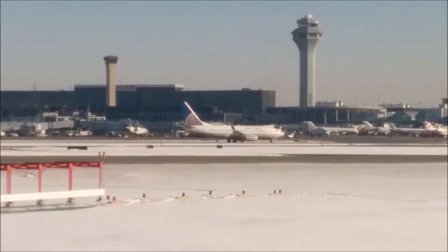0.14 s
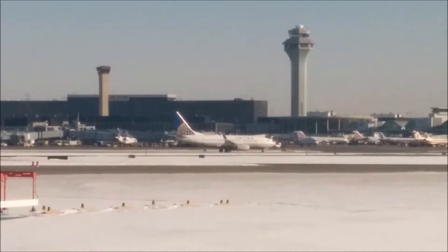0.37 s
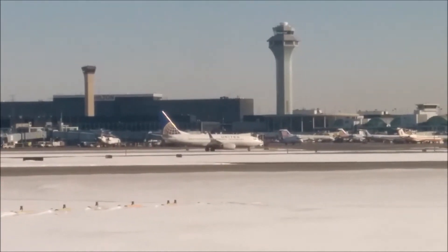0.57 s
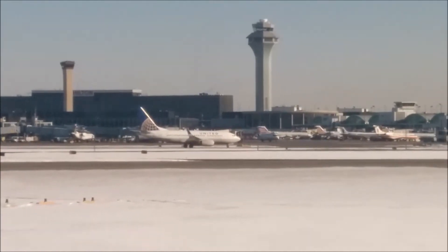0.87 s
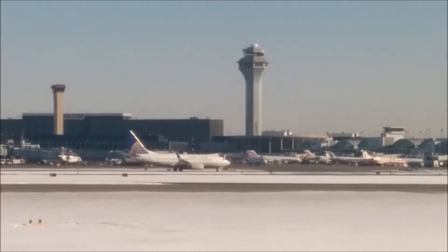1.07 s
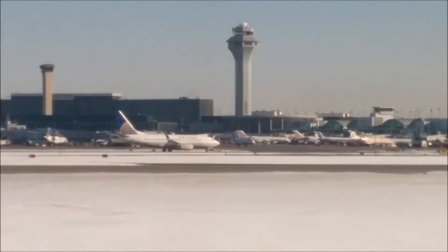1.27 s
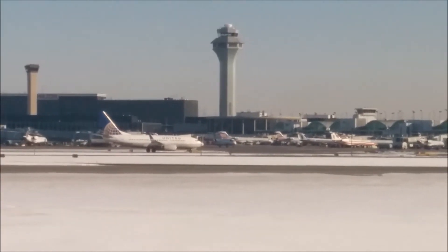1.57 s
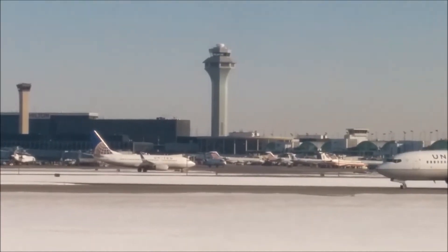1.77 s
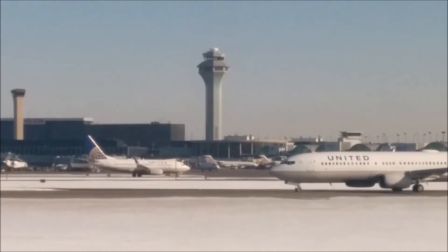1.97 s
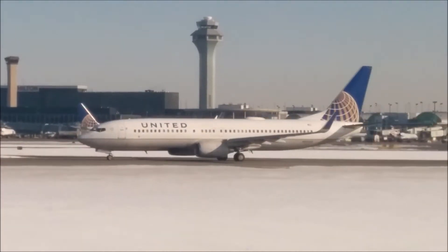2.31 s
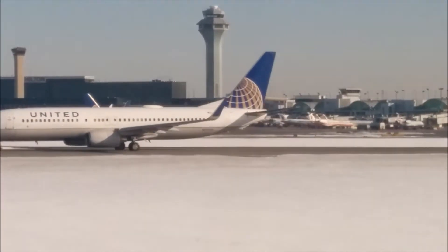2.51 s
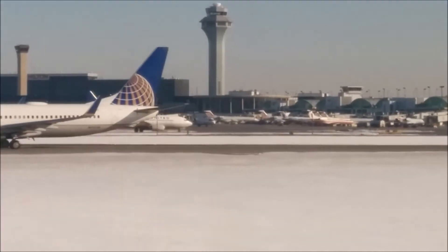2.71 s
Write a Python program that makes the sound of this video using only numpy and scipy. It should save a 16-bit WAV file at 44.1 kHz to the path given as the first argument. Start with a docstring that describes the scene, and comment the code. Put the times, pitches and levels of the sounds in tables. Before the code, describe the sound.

Inside an airliner cabin rolling along the ground, a muffled engine drone swells and fades above bassy wheel rumble. A dull panel knock comes early, then close scuffs and ticks, with quiet vent hiss throughout.

```python
"""Aircraft engines at idle hum in a few wavering tones, heard inside an airliner that taxis.
Each hum is a sine whose pitch and level drift; the muffled engine roar and outside air are banded noise.
The wheels rumble as noise, with ringing hull resonances and a low shuddering tone at each bump.
Air vents hiss, whine and whistle. Close by, shaped noise makes fabric rustle and scuff,
and loose plastic fittings ring as they tick, knock and scrape, or squeak in gliding tones."""
import sys
import numpy as np
from scipy import signal
from scipy.fft import rfft, irfft
from scipy.io import wavfile

SR = 44100
rng = np.random.default_rng(int(sys.argv[2]) if len(sys.argv) > 2 else 0)


def output_pcm(signal):
    """Save a mono or channel-first signal as 16-bit PCM at the path in sys.argv[1].

    Samples are clipped to [-1, 1] before scaling.
    """
    pcm = np.clip(np.atleast_2d(signal).T, -1, 1) * 32767
    wavfile.write(sys.argv[1], SR, np.round(pcm).astype(np.int16))


N = 125685  # length in samples


def from_db(db):
    """Turn decibels into a gain."""
    return 10 ** (np.asarray(db) / 20)


def rms_one(x):
    """Scale a sound to an rms (average strength) of 1."""
    return x / np.sqrt(np.mean(x ** 2) + 1e-20)


def clock():
    """Time of each sample in seconds."""
    return np.arange(N) / SR


def level(rows):
    """Gain over time, joining (time [s], level [dB]) points with straight lines in dB."""
    return from_db(np.interp(clock(), *np.transpose(rows)))


def drift(rate):
    """Slow random motion with a spread of about 1; a higher rate [Hz] moves faster."""
    step = 40  # make one value every 40 samples, then join them
    warm_up = 2000
    r = np.exp(-2 * np.pi * rate * step / SR)
    noise = rng.standard_normal(N // step + 2 + warm_up)
    slow = signal.lfilter([1], [1, -2 * r, r * r], noise)[warm_up:]
    return np.interp(np.arange(N) / step, np.arange(len(slow)), rms_one(slow))


def white():
    """Plain hiss with all pitches equally strong."""
    return rng.standard_normal(N)


GRAIN_SPREAD_DB = 3.0


def grains(per_s):
    """Random clicks of uneven size and either sign; rms 1."""
    size_db = GRAIN_SPREAD_DB * np.minimum(rng.exponential(1, N), 3)
    sizes = from_db(size_db) * rng.choice([-1, 1], N)
    return rms_one(sizes * (rng.random(N) < per_s / SR))


def wavering(hz, wander_hz, rate):
    """A sine whose pitch wanders at random."""
    cycles = np.cumsum(hz + wander_hz * drift(rate)) / SR
    return np.sin(2 * np.pi * (cycles + rng.random()))


def swell(s, length):
    """A smooth rise and fall, highest at time s, lasting length seconds in all."""
    return np.cos(np.pi * np.clip((clock() - s) / length, -.5, .5)) ** 2


def envelope(s, attack_s, hold_s, t60):
    """Rise from time s, hold, then die away by 60 dB in t60 seconds."""
    age = clock() - s
    rise = np.clip(age / attack_s, 0, 1)
    return rise * np.exp(-np.log(1000) * np.maximum(age - attack_s - hold_s, 0) / t60)


def ring(force, modes):
    """Each mode is a tone that dies away; a unit click starts it at its level."""
    out = 0
    for hz, db, t60 in modes:
        r = np.exp(-np.log(1000) / (t60 * SR))
        w = 2 * np.pi * hz / SR
        mode = signal.lfilter([0, np.sin(w)], [1, -2 * r * np.cos(w), r * r], force + 1e-18)
        out = -out + from_db(db) * mode  # neighbours get opposite signs
    return out


def tint(x, spectrum):
    """Give steady noise a smooth spectrum with a steep cut below its lowest point; rms 1."""
    points, db = np.transpose(spectrum)
    hz = np.arange(N // 2 + 1) * SR / N + 1  # the 1 avoids log(0)
    low_cut = np.minimum(hz / points[0], 1) ** 4
    gain = from_db(np.interp(np.log(hz), np.log(points), db)) * low_cut
    return rms_one(irfft(rfft(x) * gain, N))


def turbulence(spectrum, patchy_db, surge_db):
    """Quarter-octave bands of noise; each flickers alone and all surge together; rms 1."""
    hz, db = np.transpose(spectrum)
    edges = 18 * 2 ** (np.arange(41) / 4)
    pair = white(), white()  # neighbouring bands use different noise
    surge = surge_db * drift(22)
    out = 0
    for k, (low, high) in enumerate(zip(edges, edges[1:])):
        if high < hz[0] or low > hz[-1]:
            continue
        flicker = patchy_db * drift(16)
        band_filter = signal.butter(3, [low, high], "band", fs=SR, output="sos")
        band = signal.sosfilt(band_filter, pair[k % 2])
        band_db = np.interp(np.log(low * high) / 2, np.log(hz), db)
        out = out + band * from_db(band_db + flicker)
    return rms_one(out * from_db(surge))


# engine roar through the hull: (frequency [Hz], relative level [dB per Hz])
ROAR_SPECTRUM = [(220, -3.5), (280, 5), (330, -4), (400, -4.5), (480, -17)]
# engine roar over time: (time [s], level [dB])
ROAR_LEVEL = [(0, -40.5), (.2, -42.5), (.32, -41), (.43, -50.5), (.56, -30), (.68, -46.5), (.95, -42.5),
              (1.18, -45), (1.28, -35), (1.42, -42.5), (1.69, -37), (2.02, -39), (2.1, -29), (2.22, -42),
              (2.3, -36.5), (2.5, -40.5), (2.85, -35.5)]
# rush of air along the hull: (frequency [Hz], relative level [dB per Hz])
RUSH_SPECTRUM = [(340, -7.5), (430, 2), (540, -9.5), (660, -9.5), (820, -15.5), (1100, -26.5),
                 (1400, -30.5)]
# rush of air over time: (time [s], level [dB])
RUSH_LEVEL = [(0, -44), (.25, -45.5), (.32, -39.5), (.37, -49), (.7, -47), (.9, -45), (1.0, -47),
              (1.3, -43), (1.65, -48.5), (1.86, -42.5), (2.08, -47), (2.16, -42.5), (2.22, -46.5),
              (2.65, -47.5), (2.85, -39.5)]
ROAR_PATCHY_DB, ROAR_SURGE_DB = 3.2, 1.8


def roar():
    """Muffled engine noise and the rush of outside air: noise bands that surge and sag."""
    engine_roar = level(ROAR_LEVEL) * turbulence(ROAR_SPECTRUM, ROAR_PATCHY_DB, ROAR_SURGE_DB)
    air_rush = level(RUSH_LEVEL) * turbulence(RUSH_SPECTRUM, ROAR_PATCHY_DB, ROAR_SURGE_DB)
    return engine_roar + air_rush


# hiss of the air vents: (frequency [Hz], relative level [dB per Hz])
VENT_SPECTRUM = [(500, 11.5), (800, 6), (1100, 8.5), (1600, -0.5), (2100, 4.5), (2700, -1), (3300, -12.5),
                 (3900, -2.5), (4600, -26.5), (6200, -22.5), (8500, -50.5), (12000, -35), (15500, -32)]
# vent hiss over time: (time [s], level [dB])
VENT_LEVEL = [(0, -52.5), (.3, -51.5), (.4, -61), (.52, -51), (.66, -50.5), (.9, -58), (1.15, -54.5),
              (1.3, -54.5), (1.45, -55), (1.53, -53), (1.6, -58.5), (1.7, -49.5), (1.85, -52.5),
              (2.15, -54.5), (2.38, -54), (2.5, -60.5), (2.56, -50.5), (2.69, -55), (2.75, -58.5),
              (2.85, -49.5)]
# whine of the air nozzle over time: (time [s], level [dB rms])
WHINE_LEVEL = [(0, -54.5), (.4, -64), (.65, -58), (1.0, -63), (1.6, -66.5), (1.95, -58.5), (2.3, -58),
               (2.52, -60), (2.85, -59.5)]
VENTS_PATCHY_DB, VENTS_SURGE_DB = 3.6, .8
WHINE_HZ, WHINE_WANDER_HZ, WHINE_JITTER_HZ, WHINE_FLUTTER_DB = 2100, 85, 90, 4.5
WHISTLE_S, WHISTLE_LENGTH_S, WHISTLE_HZ, WHISTLE_T60_S = 1.91, 0.5, 5980, .01
WHISTLE_DB, WHISTLE_FLUTTER_DB = -68, 2.5


def vents():
    """Cabin air hisses as noise, a nozzle whines with a shaky pitch, and a faint whistle passes."""
    hiss = level(VENT_LEVEL) * turbulence(VENT_SPECTRUM, VENTS_PATCHY_DB, VENTS_SURGE_DB)
    flutter = from_db(WHINE_FLUTTER_DB * np.clip(drift(28), -2, 1.5))
    whine_hz = WHINE_HZ + WHINE_WANDER_HZ * drift(14)
    whine = rms_one(flutter * wavering(whine_hz, WHINE_JITTER_HZ, rate=220))
    # noise through one quickly damped mode makes the whistle hissy
    airy_tone = rms_one(ring(white(), [(WHISTLE_HZ, 0, WHISTLE_T60_S)]))
    whistle_gain = from_db(WHISTLE_DB + WHISTLE_FLUTTER_DB * drift(25))
    whistle = whistle_gain * swell(WHISTLE_S, WHISTLE_LENGTH_S) * airy_tone
    return hiss + level(WHINE_LEVEL) * whine + whistle


# soft rustle: (frequency [Hz], relative level [dB per Hz])
RUSTLE_SPECTRUM = [(2000, -22), (3500, -6), (4700, -16), (6000, -1.5), (7000, 3), (8300, 2), (9500, -4.5),
                   (11500, -5), (13500, -15), (15500, -33.5)]
# rustle over time: (time [s], level [dB])
RUSTLE_LEVEL = [(0, -54), (.14, -58.5), (.34, -64), (.42, -72), (.51, -74.5), (.56, -63.5), (.63, -61.5),
                (.68, -54.5), (.78, -61), (.98, -55), (1.12, -52.5), (1.19, -50.5), (1.3, -51),
                (1.45, -61.5), (1.62, -71.5), (1.8, -70), (2.03, -79), (2.08, -57.5), (2.2, -70),
                (2.37, -72.5), (2.43, -67), (2.68, -73.5), (2.85, -65.5)]
# harder scuffs: (frequency [Hz], relative level [dB per Hz])
SCUFF_SPECTRUM = [(300, 26.5), (550, 23), (900, 8.5), (1600, 6), (2200, 8), (3800, 8.5), (4800, 1.5),
                  (7000, 6.5), (9000, 4.5), (12000, -5.5), (15000, -15)]
# each scuff: (start time [s], hold [s], level before roughness [dB])
SCUFFS = [(0.634, 0.041, -47), (1.004, 0.016, -30), (1.038, 0.005, -39.5), (1.248, 0.015, -43),
          (2.685, 0.032, -53.5)]
FIBRES_PER_S, FIBRES_DB = 840, -4  # small clicks; level relative to the hiss
SCUFF_GRAINS_PER_S, SCUFF_GRAINS_DB = 1500, 0
SCUFF_ATTACK_S, SCUFF_T60_S, SCUFF_ROUGH_DB = .018, .16, 1.5


def fabric():
    """Cloth slides softly as noise mixed with tiny clicks, with a few grainy scuffs."""
    fibres = from_db(FIBRES_DB) * grains(FIBRES_PER_S)
    rustle = level(RUSTLE_LEVEL) * tint(white() + fibres, RUSTLE_SPECTRUM)
    strokes = 0
    for s, hold_s, db in SCUFFS:
        strokes = strokes + from_db(db) * envelope(s, SCUFF_ATTACK_S, hold_s, SCUFF_T60_S)
    grit = from_db(SCUFF_GRAINS_DB) * grains(SCUFF_GRAINS_PER_S)
    roughness = from_db(SCUFF_ROUGH_DB * drift(97))
    return rustle + strokes * roughness * tint(white() + grit, SCUFF_SPECTRUM)


# ringing of the plastic trim: (frequency [Hz], relative level [dB], time to fall 60 dB [s])
TRIM_MODES = [(520, 8, .05), (610, 6, .05), (877, -3, .05), (1960, -2, .04), (2740, -2, .015),
              (3400, -3, .015), (4160, -3, .02)]
DRAG_S, DRAG_LENGTH_S, DRAG_DB = 1.05, 0.13, -39.5


def drag():
    """The hardest scuff drags over plastic trim: grains of friction make it ring."""
    scrape = rms_one(ring(grains(SCUFF_GRAINS_PER_S), TRIM_MODES))
    return from_db(DRAG_DB) * swell(DRAG_S, DRAG_LENGTH_S) * scrape


# trim squeaks: (peak time [s], length [s], pitch [Hz], glide [Hz per s], pitch jitter [Hz],
# peak level before roughness [dB])
SQUEAKS = [(.122, .025, 2750, -4000, 90, -55), (1.555, .02, 3400, 15000, 220, -55),
           (1.659, .035, 3050, -8000, 120, -52), (1.685, .06, 2830, -8000, 150, -56),
           (1.997, .055, 2840, 1500, 80, -54), (2.443, .05, 3880, -3000, 40, -55),
           (2.71, .06, 3920, -4000, 60, -56)]
SQUEAK_ROUGH = .45  # share of random level change


def squeaks():
    """Trim rubs in short, rough squeaks: shaky tones that glide in pitch."""
    out = 0
    for s, length, hz, glide, jitter_hz, db in SQUEAKS:
        tone = wavering(hz + glide * (clock() - s), jitter_hz, rate=180)
        roughness = 1 + SQUEAK_ROUGH * drift(170)
        out = out + from_db(db) * swell(s, length) * tone * roughness
    return out


# a loose fitting ticks: (start time [s], level [dB], ringing relative to the crack [dB])
TICKS = [(0.572, -56, 6.5), (0.639, -43, 0), (0.651, -54.5, 6), (0.663, -60, 7), (0.685, -47, -16),
         (0.909, -51, -1.5), (1.157, -36.5, -9), (1.17, -34.5, -10), (1.207, -49, -5), (1.238, -47, 0),
         (1.256, -55, 8), (1.272, -37.5, -0.5), (1.384, -51.5, -2), (2.035, -65, 8), (2.056, -51, 8.5),
         (2.067, -63, 13)]
# noisy crack of each tick: (frequency [Hz], relative level [dB per Hz])
CRACK_SPECTRUM = [(2500, -12.5), (3500, -6.5), (4600, -24), (5600, 4.5), (8000, 3), (10500, -0.5),
                  (13000, -6.5), (15500, -18.5)]
# ringing of the fitting: (frequency [Hz], relative level [dB], time to fall 60 dB [s])
TICK_MODES = [(5420, 0, .011), (5850, -3, .008)]
TICK_T60_S, TICK_ATTACK_S = .04, .002


def ticks():
    """Gritty contacts: short bursts of noise and of a noisily ringing part, in varied mixes."""
    crack = tint(white(), CRACK_SPECTRUM)
    ringing = rms_one(ring(white(), TICK_MODES))
    out = 0
    for s, db, ring_db in TICKS:
        burst = envelope(s, TICK_ATTACK_S, 0, TICK_T60_S)
        out = out + from_db(db) * burst * (crack + from_db(ring_db) * ringing)
    return out


# blows to a loose panel: (time [s], level before the panel rings [dB])
KNOCKS = [(.559, -5.5), (.567, -5.5), (.5735, 2.5), (.587, -8), (.598, -10)]
# ringing of the panel: (frequency [Hz], level for a unit click [dB], time to fall 60 dB [s])
PANEL_MODES = [(294, -28.5, 0.05), (370, -28, 0.05), (473, -30.5, 0.086), (593, -27, 0.049),
               (724, -36, .05), (866, -39, 0.1), (1100, -40, 0.032), (1207, -41, 0.028)]
JUDDER_S, JUDDER_LENGTH_S, JUDDER_DB = .58, .075, -30  # level before the panel rings


def knock():
    """A quick run of clicks and a short burst of noise set a loose panel ringing."""
    force = from_db(JUDDER_DB) * swell(JUDDER_S, JUDDER_LENGTH_S) * white()
    for s, db in KNOCKS:
        force = force + from_db(db) * (np.arange(N) == int(s * SR))
    return ring(force, PANEL_MODES)


# low rumble of the wheels: (frequency [Hz], relative level [dB per Hz])
RUMBLE_SPECTRUM = [(20, -37), (32, -28.5), (48, -8), (70, -6.5), (100, 3.5), (140, -2.5), (180, -3),
                   (240, -18.5), (300, -18.5)]
# rolling sound over time: (time [s], relative level [dB])
ROAD_LEVEL = [(0, 10.5), (.1, -2.5), (.22, -2), (.33, 0.5), (.43, -6.5), (.57, -0.5), (.64, -0.5),
              (.7, -5.5), (.8, -1.5), (.87, -9.5), (.91, -12.5), (.965, -13.5), (1.02, 3.5), (1.09, -6),
              (1.22, -4), (1.32, -5), (1.41, -0.5), (1.48, -3), (1.54, 1.5), (1.62, -4), (1.75, -3),
              (1.85, -1), (1.94, -3.5), (2.04, -6), (2.08, 0), (2.11, -3.5), (2.19, -8), (2.25, 1),
              (2.41, 2.5), (2.5, -12), (2.565, 10), (2.62, -6), (2.69, 6), (2.75, -8), (2.82, 1)]
# hull resonances: (frequency [Hz], relative level [dB], time to fall 60 dB [s])
HULL_MODES = [(92, -6.5, 0.3), (118.6, 2, 0.17), (143.8, -1.5, 0.43)]
# hull shudders over bumps: (peak time [s], length [s], pitch [Hz], peak level [dB])
SHUDDERS = [(0.174, 0.097, 85.5, -12.5), (0.268, 0.46, 54.4, -24), (0.286, 0.14, 92, -7),
            (0.729, 0.032, 105, -8.5), (0.861, 0.016, 127.6, -9), (0.995, 0.038, 109.5, -11),
            (1.023, 0.079, 95.74, -6.5), (1.08, 0.2, 50, -19.5), (1.131, 0.077, 85.5, -13.5),
            (1.154, 0.027, 100.3, -3.5), (1.217, 0.022, 110.2, -9), (1.39, 0.15, 56, -17),
            (1.392, 0.26, 92, -15), (1.771, 0.079, 51.55, -17.5), (1.834, 0.049, 147.2, -11),
            (1.935, .04, 89.94, -14), (2.235, 0.057, 75.3, -18), (2.266, 0.024, 124.8, -7.5),
            (2.446, 0.11, 55, -16), (2.555, 0.07, 120, -13), (2.672, 0.13, 60.45, -20.5),
            (2.695, 0.098, 98, -13.5)]
RUMBLE_DB, HULL_DB = -22, -25.5  # before the rolling level is applied
RUMBLE_PATCHY_DB, RUMBLE_SURGE_DB, SHUDDER_WANDER_HZ = 2.5, 2.0, 3.96


def wheels():
    """Rolling rumble and noise-driven hull ringing, plus a brief low boom at each bump."""
    rumble = from_db(RUMBLE_DB) * turbulence(RUMBLE_SPECTRUM, RUMBLE_PATCHY_DB, RUMBLE_SURGE_DB)
    hull = from_db(HULL_DB) * rms_one(ring(white(), HULL_MODES))
    out = level(ROAD_LEVEL) * (rumble + hull)
    for s, length, hz, db in SHUDDERS:
        boom = wavering(hz, SHUDDER_WANDER_HZ, rate=18.2)
        out = out + from_db(db) * swell(s, length) * boom
    return out


# main engine drone: (time [s], level before its random swing [dB rms])
DRONE_LEVEL = [(0, -25), (.1, -32), (.25, -37), (.3, -20.5), (.4, -45.5), (.55, -21.5), (.64, -21.5),
               (.7, -38), (.8, -25.5), (.95, -40.5), (1.13, -44.5), (1.29, -29.5), (1.33, -43.5),
               (1.62, -34), (1.71, -20.5), (1.78, -40), (1.82, -21), (1.89, -20.5), (1.93, -37),
               (2.13, -22.5), (2.17, -32), (2.3, -19), (2.48, -34), (2.54, -25), (2.75, -41.5), (2.81, -22),
               (2.85, -37)]
# second engine tone: (time [s], level before its gain and random swing [dB rms])
HUM_LEVEL = [(0.0, -37.5), (0.44, -43.5), (0.53, -36.5), (0.81, -40.5), (0.92, -50.5), (0.96, -34.5),
             (1.42, -44), (1.51, -34.5), (1.81, -48.5), (1.88, -36), (2.04, -42.5), (2.12, -32),
             (2.29, -44), (2.38, -34), (2.52, -43.5), (2.56, -31), (2.7, -42), (2.85, -28)]
# weaker tones: (pitch [Hz], level [dB rms], swing of the level [dB], pitch wander [Hz])
WEAK_TONES = [(413.5, -50, 6, 4), (727, -63, 3, 3), (1954, -70, 6, 14)]
DRONE_HZ, DRONE_WANDER_HZ, DRONE_SWING_DB = 208.8, 3, 2
HUM_HZ, HUM_WANDER_HZ, HUM_SWING_DB, HUM_GAIN_DB = 347.8, 3.2, 2, -1


def engines():
    """Two sine-like engine tones swell, fade and waver, with weaker ones that come and go."""
    drone_swing = from_db(DRONE_SWING_DB * drift(34))
    drone = level(DRONE_LEVEL) * drone_swing * wavering(DRONE_HZ, DRONE_WANDER_HZ, rate=14.2)
    hum_swing = from_db(HUM_GAIN_DB + HUM_SWING_DB * drift(20))
    hum = level(HUM_LEVEL) * hum_swing * wavering(HUM_HZ, HUM_WANDER_HZ, rate=12)
    out = drone + hum
    for hz, db, swing_db, wander_hz in WEAK_TONES:
        swing = rms_one(from_db(swing_db * np.tanh(drift(8))))
        out = out + from_db(db) * swing * wavering(hz, wander_hz, rate=10)
    return np.sqrt(2) * out  # a sine of rms 1 peaks at the square root of 2


def scene():
    """Add all the sounds together in one channel."""
    background = roar() + vents()
    close_by = fabric() + drag() + squeaks() + ticks() + knock()
    return (background + close_by + wheels() + engines())[None]


CUTOFF_HZ, FADE_S = 15700, .004


def record(dry):
    """Fade both ends briefly and cut the highest treble steeply."""
    ease = np.clip(np.minimum(clock(), clock()[::-1]) / FADE_S, 0, 1)
    treble_cut = signal.ellip(10, .1, 80, CUTOFF_HZ, fs=SR, output="sos")
    return signal.sosfilt(treble_cut, dry * ease)


dry = scene()
out = record(dry)
output_pcm(out)
```